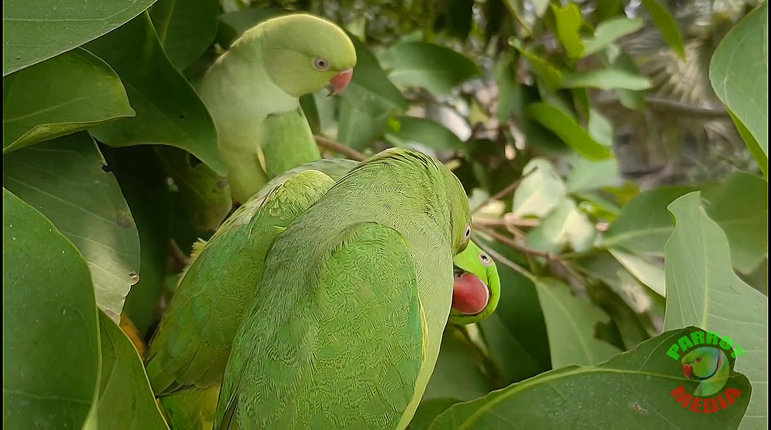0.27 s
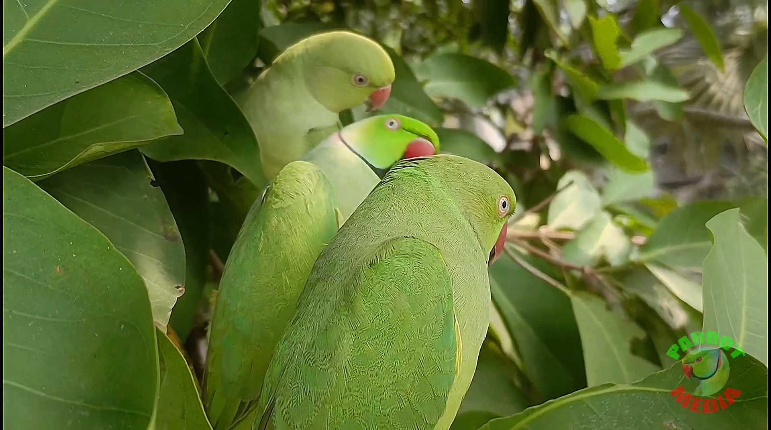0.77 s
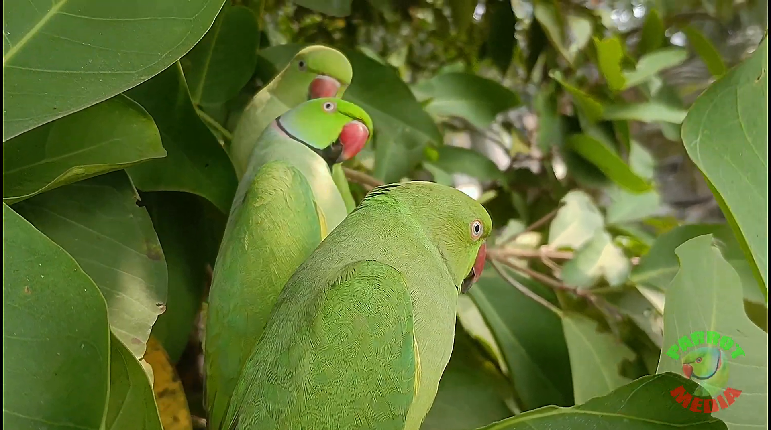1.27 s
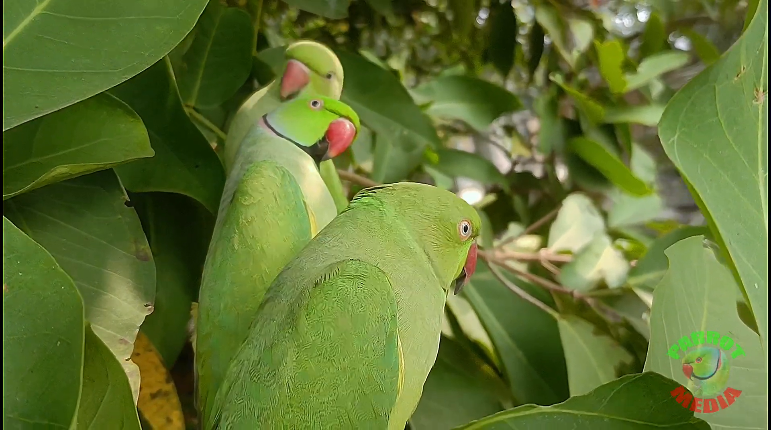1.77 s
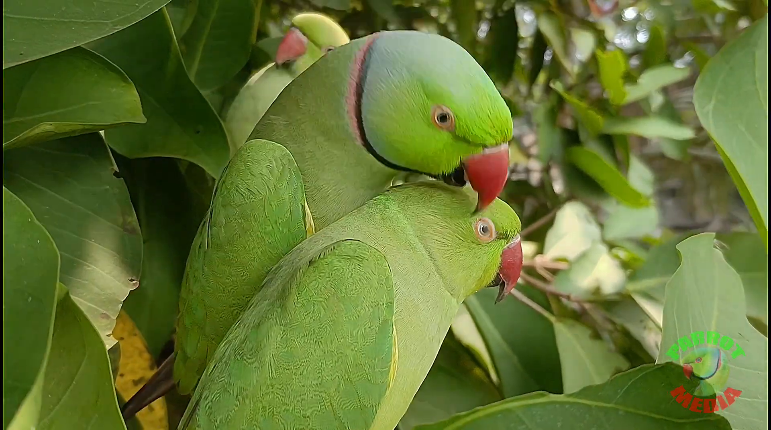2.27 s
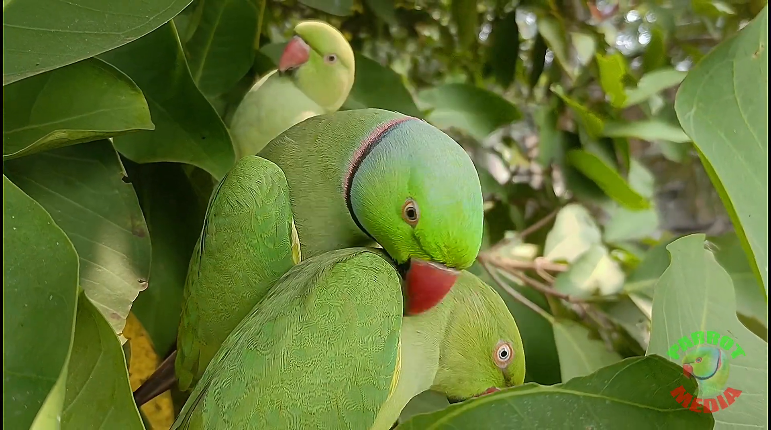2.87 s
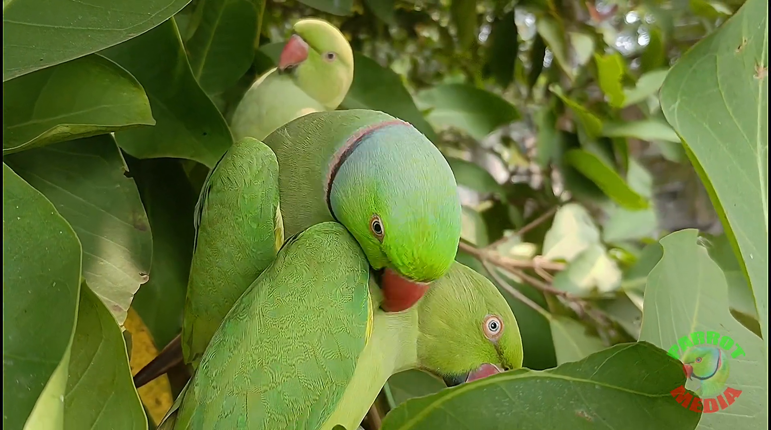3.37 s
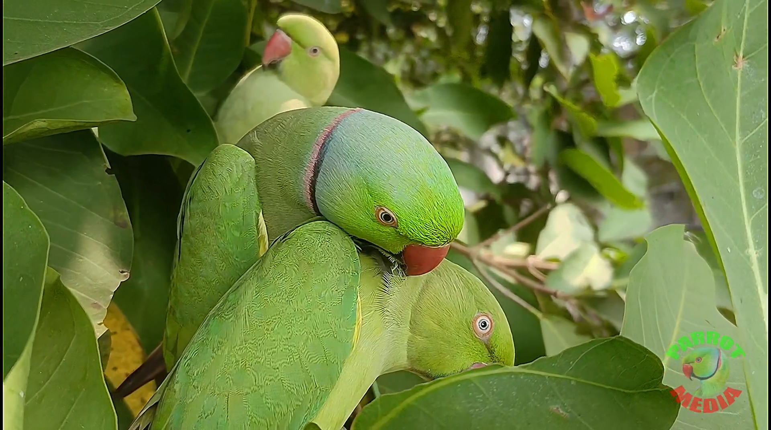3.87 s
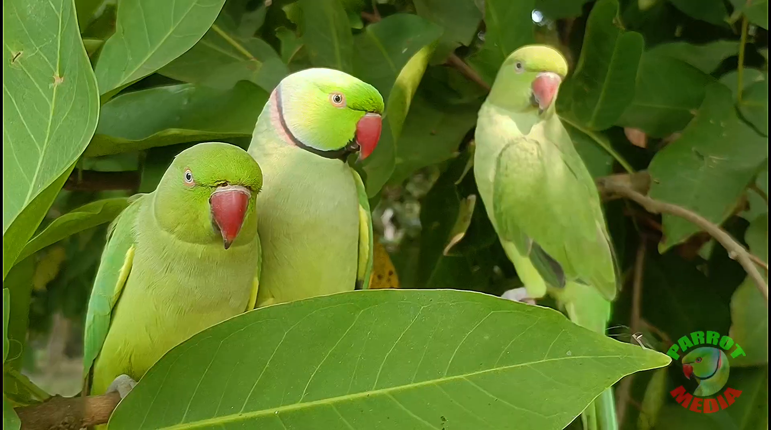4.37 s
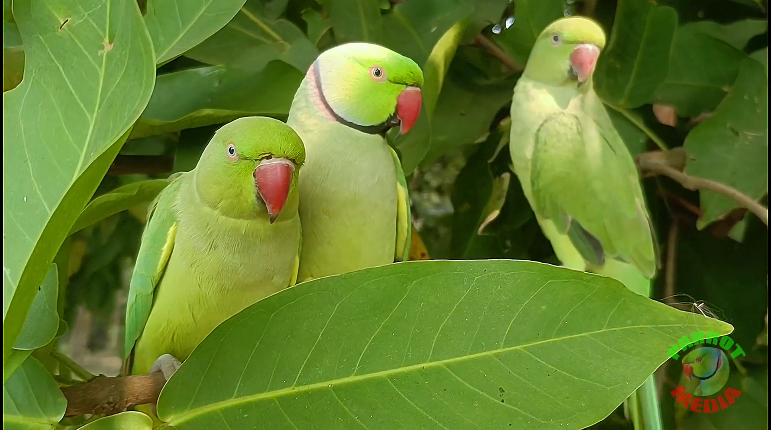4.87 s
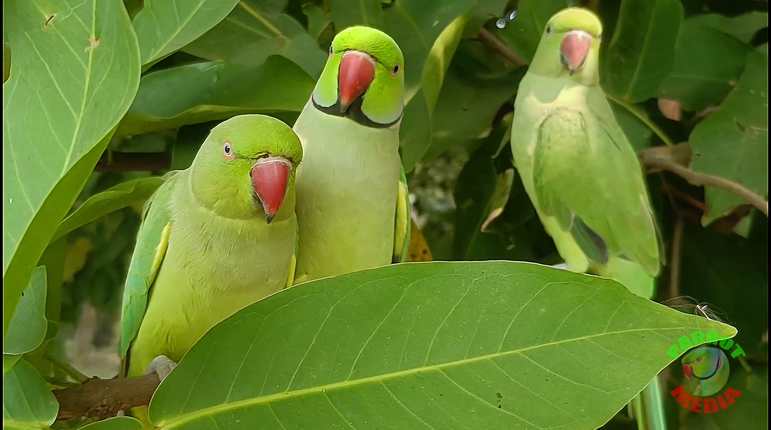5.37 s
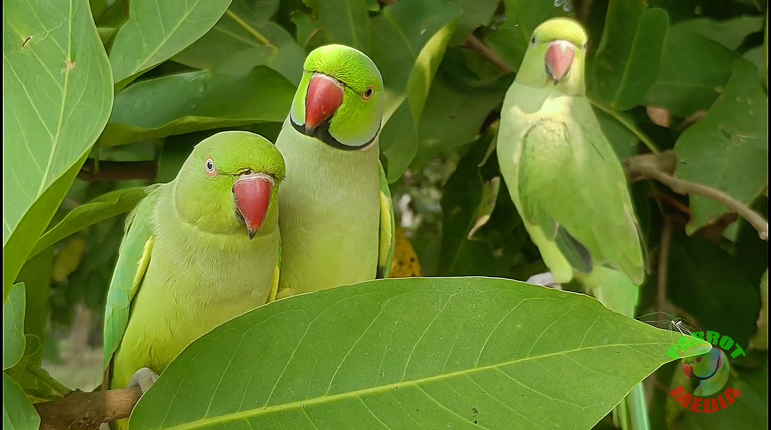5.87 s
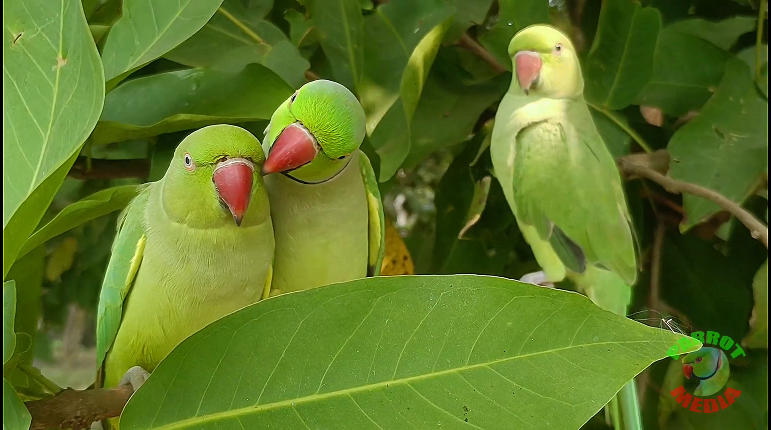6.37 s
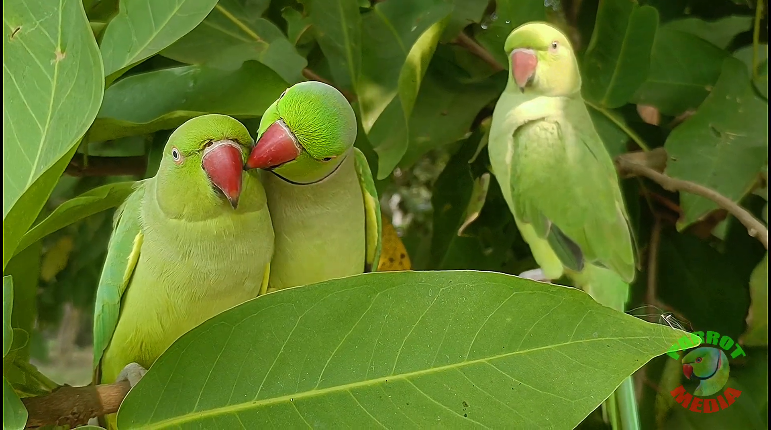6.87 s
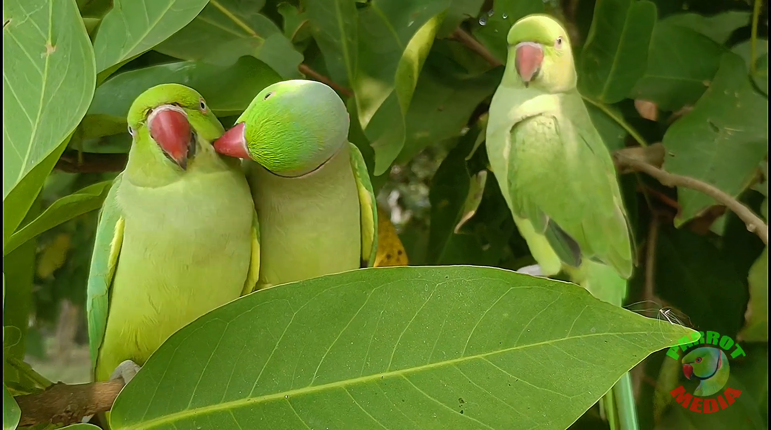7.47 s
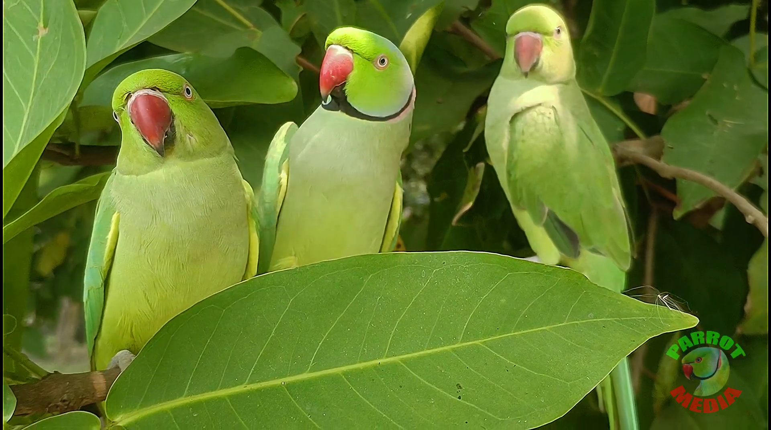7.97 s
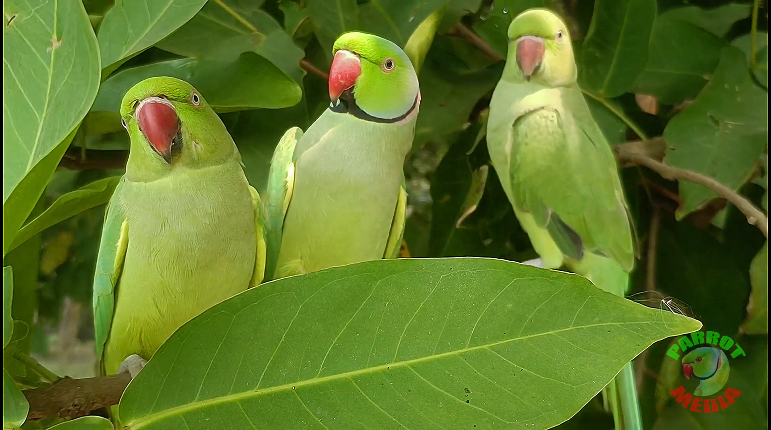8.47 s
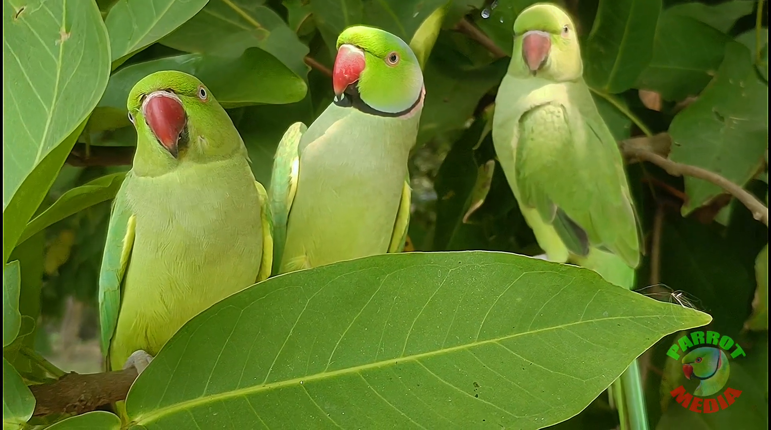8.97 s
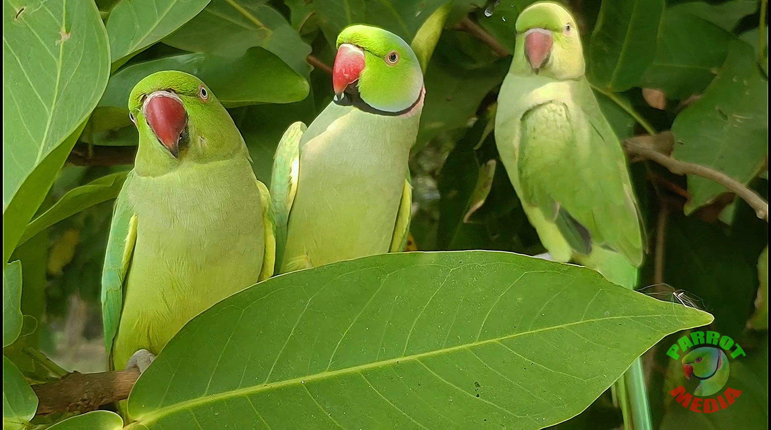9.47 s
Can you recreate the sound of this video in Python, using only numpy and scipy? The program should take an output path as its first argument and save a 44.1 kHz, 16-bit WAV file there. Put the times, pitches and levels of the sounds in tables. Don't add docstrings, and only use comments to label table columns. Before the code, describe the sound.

Close parakeets screech harshly, then squawk, trill and whistle in a leafy tree; small birds twitter far off before a second screeching burst.

```python
import sys
import numpy as np
from scipy import signal
from scipy.io import wavfile
from scipy.ndimage import uniform_filter1d

SR = 44100
rng = np.random.default_rng(int(sys.argv[2]) if len(sys.argv) > 2 else 0)


def linear_from_db(decibels):
    return 10 ** (np.asarray(decibels, float) / 20)


def transcribe(signal):
    frames = np.atleast_2d(signal).T
    limited = np.clip(frames, -1, 1)
    pcm = np.round(limited * 32767).astype(np.int16)
    wavfile.write(sys.argv[1], SR, pcm)


N = 429093


def evened(x):
    return x / np.sqrt(np.mean(abs(x) ** 2) + 1e-20)


def read(points, hz):
    f, value = np.transpose(points)
    return np.interp(np.log(hz + 1), np.log(f + 1), value)


def add(mix, s, sound):
    part = mix[:, round(s * SR):][:, :sound.shape[1]]
    part += sound[:, :part.shape[1]]


def backdrop(t):
    # start_s, end_s, first_lift_db, last_lift_db
    spells = [
        (0, 1.3, 6, 8),
        (2.0, 4.62, 10, 5),
        (6.08, 8.31, 7, 5.5),
    ]
    # centre_s, width_s, lift_db
    gusts = [
        (6.72, .16, 3.5),
        (7.8, .14, 5),
        (4.5, .06, 3.5),
    ]
    # time_s, level_db
    flock_near = [(0, -66), (1.5, -69.5), (2.1, -66), (4.3, -69), (4.5, -61), (4.7, -65), (5.9, -61),
                  (6.1, -63), (8.3, -66), (8.5, -63), (9.73, -73.5)]
    lift_db = 0
    for start_s, end_s, first_db, last_db in spells:
        inside = (t >= start_s) * (t < end_s)
        lift_db = lift_db + inside * np.interp(t, (start_s, end_s), (first_db, last_db))
    lift_db = uniform_filter1d(lift_db, size=5, mode="nearest")
    gust_db = sum(db * np.exp(-((t - s) / width_s) ** 2) for s, width_s, db in gusts)
    flock_db = np.interp(t, *np.transpose(flock_near)) + .6 * lift_db
    return -52 + gust_db, -67 + lift_db, flock_db, -69 + .5 * lift_db


def garden():
    # freq_hz, density_db
    rumble_bands = [(12, -44), (20, -21), (48, -0.5), (113, -1.5), (156, -4), (320, -23), (420, -51.5),
                    (700, -120)]
    hum_bands = [(150, -36.5), (250, -5.5), (570, -8.5), (824, -15), (897, -17.5), (2060, -16.5),
                 (2400, -13.5), (3120, -66), (5280, -120)]
    flock_bands = [(1060, -42.5), (1800, -14.5), (3120, -4), (4360, -6), (4670, -5.5), (5020, -17),
                   (5300, -18), (6890, -44), (11700, -120)]
    hiss_bands = [(2940, -41.5), (5000, 0), (6850, 1.5), (9380, -6.5), (14600, -1), (15700, -16),
                  (16500, -41)]
    # freq_hz, likeness_0_to_1
    likeness = [(30, .975), (300, .97), (1000, .8), (2500, .2), (8000, .05)]
    frames, hz = N // 256 + 5, np.fft.rfftfreq(1024, 1 / SR)
    a, b, c, d, patches = rng.standard_normal((frames, 513, 5)).T
    patches = evened(uniform_filter1d(uniform_filter1d(patches, 8, 0), 14, 1))
    shapes = (rumble_bands, hum_bands, flock_bands, hiss_bands)
    levels_db = backdrop(np.arange(frames) * 256 / SR)
    power = 0
    for shape, level_db, patchy_db in zip(shapes, levels_db, (.4, .5, 2.2, .8)):
        gain = linear_from_db(read(shape, hz)) * (hz >= shape[0][0]) * (hz <= shape[-1][0])
        level = linear_from_db(level_db + patchy_db * patches)
        power = power + (gain[:, None] / np.linalg.norm(gain) * level) ** 2
    same = np.clip(read(likeness, hz), -1, 1)[:, None]
    left = a + 1j * b
    right = same * left + np.sqrt(1 - same ** 2) * (c + 1j * d)
    z = np.array([left, right]) * np.sqrt(power)
    return linear_from_db(-3.0) * signal.istft(z, nperseg=1024, noverlap=768)[1][:, :N]


def foliage(x, t60_s, size):
    t = np.arange(size) / SR
    sign = rng.choice([-1., 1.], (2, size))
    taps = sign * (rng.random((2, size)) < .05) * linear_from_db(-60 * t / t60_s) * (t > .004)
    return signal.fftconvolve(x, taps / np.linalg.norm(taps[0]), axes=1)[:, :N]


def twitter():
    # start_s, length_s, level_db
    swoops = [(.009, .056, -61.5), (5.0, .085, -61), (5.2, .094, -60.5), (5.398, .08, -57.5),
              (5.59, .085, -58), (5.811, .084, -60), (6.237, .11, -59), (6.49, .075, -60),
              (8.15, .12, -60.5), (8.38, .082, -59), (8.596, .079, -58.5)]
    pips = [(.094, .063, -67), (1.177, .043, -65.5), (1.37, .028, -68.5), (1.545, .036, -68),
            (1.735, .035, -65.5), (3.3, .03, -64.5), (4.46, .074, -68), (5.739, .03, -55),
            (5.91, .011, -56), (6.418, .025, -59), (8.291, .08, -68), (8.876, .08, -75), (9.41, .06, -74),
            (9.572, .062, -71)]
    queries = [
        (7.734, .043, -63),
        (7.978, .029, -61.5),
        (8.33, .061, -69),
        (8.895, .03, -66.5),
        (9.169, .04, -69),
        (9.494, .04, -70),
    ]
    # start_s, length_s, start_hz, end_hz, level_db
    other_notes = [(1.656, .12, 3300, 3670, -69), (1.714, .08, 5130, 5400, -65.5),
                   (1.733, .097, 5900, 6170, -70.5), (4.415, .054, 4900, 4100, -62),
                   (4.773, .022, 3200, 2400, -58), (4.799, .15, 4980, 2420, -66.5),
                   (4.925, .039, 6800, 5950, -62.5), (5.68, .12, 3300, 3400, -66.5),
                   (5.833, .033, 2780, 2230, -62), (6.025, .06, 4720, 3770, -56),
                   (6.6, .07, 3700, 4700, -63), (4.93, .05, 2600, 2400, -64),
                   (6.198, .098, 2700, 2250, -68.5), (6.74, .09, 6500, 6000, -61.5),
                   (8.101, .12, 3250, 3050, -66.5), (8.091, .08, 3500, 3450, -67),
                   (9.502, .15, 3150, 3050, -76), (9.713, .025, 4950, 4480, -59),
                   (3.499, .39, 437, 444, -69.5), (4.042, .14, 725, 706, -71),
                   (4.797, .35, 729, 619, -77.5), (7.656, .72, 736, 663, -77.5)]
    phrases = [(swoops, 4720, 3180), (pips, 4470, 4530), (queries, 3530, 4070)]
    notes = []
    for rows, start_hz, end_hz in phrases:
        notes += [(s, length_s, start_hz, end_hz, db) for s, length_s, db in rows]
    return notes + other_notes


def songbirds():
    out = np.zeros((2, N))
    for s, length_s, start_hz, end_hz, db in twitter():
        u = np.arange(0, 1, 1 / SR / length_s)
        depth = .045 if start_hz > 6300 else .016
        wheeze = depth * evened(uniform_filter1d(rng.standard_normal(len(u)), 60))
        offset = rng.uniform(0, .3, (2, 1))
        hz = start_hz * (end_hz / start_hz) ** u * (1 + wheeze)
        tone = np.sin(2 * np.pi * (np.cumsum(hz) / SR + offset))
        swell = np.sin(np.pi * u ** 0.45) ** 0.7
        add(out, s, linear_from_db(db + 4.3) * linear_from_db([[.8], [-.8]]) * tone * swell)
    return out + linear_from_db(-.5) * foliage(out, t60_s=.4, size=22000)


def voice(pitch, rough, bright_db, beak, shade, edge_db, hollow_db):
    # freq_hz, gain_db
    throat_bands = [(400, 2.5), (1100, -9), (1600, 2.46), (1950, -1.5), (2450, -18.5), (3200, -6.5),
                    (4300, -0.74), (5200, -2), (6000, -13), (7800, -19.5), (9200, -41), (10800, -22.5),
                    (12800, -28), (15500, -34)]
    # freq_hz, phase_rad
    twist = [(2000, 0.015), (2900, 0.59), (3700, 1.3), (4900, -.8), (7000, 1.5)]
    # freq_hz, left_right_db
    ports = [(500, -1.5), (1500, -0.5), (2300, -16.5), (3100, -6.5), (4250, 11), (4800, 3.5), (5300, 0),
             (6800, -13), (8000, 4), (9800, 12.5), (13000, 3.5)]
    port_lag = 5.69
    order = np.arange(1, int(15800 / pitch.min()))[:, None]
    hz = order * pitch
    upper = 1 / (1 + (2500 / hz) ** 8)
    top = 1 / (1 + (5800 / hz) ** 8)

    edge_share = np.where((hz < 9000) | (pitch > 950), 1, .25)
    throat_db = read(throat_bands, hz / beak ** (1 - upper))
    throat_db += upper * (bright_db + 2.5) + top * edge_db * edge_share
    throat_db += hollow_db * np.exp(-((hz - 3100) / 600) ** 2)
    throat = linear_from_db(throat_db) * (hz < 15500)
    throat /= np.sqrt(.5 * (throat ** 2).sum(0))

    noise = rng.standard_normal((2,) + hz.shape)
    breath = evened(uniform_filter1d(uniform_filter1d(noise[0] + 1j * noise[1], 30), 30))
    blur = np.clip(rough * (.6 + 2.2 * upper + 3 * top) + .22 * top, 0, 1)
    throat *= linear_from_db(3.5 * upper * evened(uniform_filter1d(noise[0], 900)))
    spread = rng.uniform(-1.6, 1.6, order.shape)
    partials = np.exp(2j * np.pi * order * np.cumsum(pitch) / SR + 1j * spread)
    wave = throat * partials * (np.sqrt(1 - blur ** 2) + blur * breath)

    lead = read(twist, hz) - 2 * np.pi * hz * port_lag / SR
    pan = linear_from_db(.5 * shade * read(ports, hz))
    return np.array([(wave * pan * np.exp(1j * lead)).real.sum(0), (wave / pan).real.sum(0)])


def beat(peak_db, hz, bright_db, ms, edge_db=4.0):
    u = np.arange(0, 1.2, 1000 / ms / SR)
    swell = (u / .36 * np.exp(1 - u / .36)) ** 2.6
    tone = voice(hz * (1.05 - .1 * u), rough=.25, bright_db=bright_db - 5 * u, beak=.72, shade=1.0,
                 edge_db=edge_db, hollow_db=5.0)
    return linear_from_db(peak_db - 9) * swell * tone


def murmurs():
    # start_s, beats, gap_s, peak_db, pitch_hz, first_bright_db, last_bright_db
    trills = [
        (.095, 9.7, 0.018, -46, 1110, -3.5, 4.1),
        (6.73, 11, .0195, -41, 1150, -2.5, 17),
    ]
    out = np.zeros((2, N))
    for s, count, gap_s, peak_db, hz, first_db, last_db in trills:
        for k in range(round(count)):
            bright_db = first_db + (last_db - first_db) * k / count
            add(out, s + k * gap_s, beat(peak_db + rng.normal(0, 1.4), hz, bright_db, 6.0))
    return out


def effort(t, db, soft_db, rise_s, fade_db_per_s, close_db, close_s):
    onset_db = soft_db * np.exp(-t / rise_s)
    closing_db = close_db * np.exp((t - t[-1]) / close_s)
    return db + onset_db - fade_db_per_s * t - closing_db


def bowl(length_s, db, turn_hz, turn_s, bend_hz_per_s2, manner):
    t = np.arange(0, length_s, 1 / SR)
    return effort(t, db, **manner), turn_hz + bend_hz_per_s2 * (t - turn_s) ** 2


def glide(length_s, db, start_hz, end_hz):
    t = np.arange(0, length_s, 1 / SR)
    way = t / length_s + .04 * np.sin(2 * np.pi * t / length_s) * (end_hz < start_hz)
    effort_db = effort(t, db, soft_db=-2.5, rise_s=.006, fade_db_per_s=80, close_db=28, close_s=.012)
    return effort_db, start_hz + (end_hz - start_hz) * way


def traced(rows):
    s, db, hz = np.transpose(rows)
    t = np.arange(s[0], s[-1], 1 / SR)
    effort_db = uniform_filter1d(np.interp(t, s, db), 300, mode="nearest")
    return effort_db, uniform_filter1d(np.interp(t, s, hz), 600, mode="nearest")


def call(effort_db, pitch, hoarse, pose):
    bright_db, shade, edge_db, beak, hollow_db = pose
    t = np.arange(len(pitch)) / SR
    if pitch.min() > 1200:
        tilt_db = .02 * (pitch - 1800)
        bright_db = bright_db + tilt_db
        edge_db = edge_db - tilt_db
    else:
        dull_at_s = .033
        bright_db = bright_db - 4 * np.exp(-((t - dull_at_s) / .014) ** 2)
        shrill = np.clip(1 + (pitch - 1250) / 300, 0, 1) * (t > dull_at_s)
        hollow_db = hollow_db * (1 - 1.1 * shrill)
        edge_db = edge_db - 9 * shrill
    pitch = pitch * (1 + .003 * evened(uniform_filter1d(rng.standard_normal(len(t)), 120)))
    rough = hoarse + 0.005 * (effort_db.max() - effort_db) + .25 * np.exp(-t / 0.013)
    edges = np.minimum(np.minimum(t, t[-1] - t) / 0.0038, 1)
    edge_db = edge_db - 40 * t
    return linear_from_db(effort_db) * edges * voice(pitch, rough, bright_db, beak, shade, edge_db, hollow_db)


def held_calls():
    # start_s, length_s, effort_db, turn_hz, turn_after_s
    openers = [
        (.311, .097, -31, 618, .043),
        (6.962, .098, -28.5, 585, .036),
    ]
    screeches = [
        (.45, .128, -17, 725, .075),
        (.614, .123, -15.5, 750, .078),
        (7.101, .121, -19, 675, .073),
        (7.263, .122, -16, 700, .073),
    ]
    arches = [
        (2.0, .087, -28.5, 572, .036),
        (6.487, .09, -37, 512, .044),
    ]
    # start_s, length_s, effort_db, start_hz, end_hz
    glides = [
        (2.752, .116, -22, 420, 955),
        (3.388, .114, -24, 425, 945),
        (3.871, .129, -22.5, 725, 320),
        (7.427, .115, -16.5, 1030, 430),
    ]
    # time_s, effort_db, pitch_hz
    upswing = [
        (.776, -12, 1098),
        (.808, -18.5, 924),
        (.84, -20, 770),
        (.88, -25.5, 707),
        (.906, -28.5, 731),
        (.935, -23, 1100),
        (.975, -16, 1360),
        (1.004, -21, 1492),
        (1.012, -45, 1517),
    ]
    # time_s, effort_db, pitch_hz
    whistles = [
        [(2.434, -25.5, 1850), (2.47, -23, 1870), (2.508, -22.5, 1696), (2.53, -23, 1499), (2.552, -35.5, 1818),
         (2.56, -50.5, 2060)],
        [(3.091, -23, 1831), (3.121, -23.5, 1809), (3.143, -23.5, 1696), (3.163, -23.5, 1760),
         (3.185, -25, 2700), (3.195, -44.5, 2627)],
        [(3.701, -23.5, 1813), (3.732, -21, 1904), (3.778, -21.5, 1739), (3.801, -21.5, 2341),
         (3.824, -27.5, 2368), (3.855, -28.5, 1724)],
    ]
    loud = dict(soft_db=-4.5, rise_s=.012, fade_db_per_s=95, close_db=30, close_s=.01)
    soft = dict(soft_db=-7, rise_s=.02, fade_db_per_s=5, close_db=26, close_s=.011)
    clear, husky, pure = .065, .11, .03
    calls = [(s, *bowl(*row, 52000, loud), clear) for s, *row in screeches]
    calls += [(s, *bowl(*row, 58000, soft), husky) for s, *row in openers]
    calls += [(s, *bowl(*row, -88000, soft), husky) for s, *row in arches]
    calls += [(s, *glide(*row), husky) for s, *row in glides]
    calls += [(rows[0][0], *traced(rows), pure) for rows in [upswing] + whistles]
    return calls


def throat_trills():
    # time_s, peak_db
    trills = [
        [(2.222, -40), (2.24, -32.5), (2.261, -32), (2.281, -23), (2.3, -20), (2.321, -18), (2.342, -20.5),
         (2.361, -23.5), (2.381, -27), (2.4, -29), (2.416, -32.5)],
        [(2.914, -29.5), (2.934, -21.5), (2.954, -18), (2.976, -8), (2.997, -1.5), (3.018, -16), (3.037, -15),
         (3.055, -24.5), (3.072, -29.5)],
        [(3.535, -40), (3.555, -32), (3.575, -18.5), (3.596, -11.5), (3.618, -13), (3.639, -19), (3.66, -31.5),
         (3.678, -38)],
    ]
    # bright_db, edge_db, halfway_share (pitch sunk halfway)
    tones = [(-15, 1.5, .55), (-1.5, -2.5, .3), (-6, 7, .25)]
    high_hz, low_hz = 1380, 1030
    beats = []
    for rows, (bright_db, edge_db, halfway) in zip(trills, tones):
        loudest_db = max(db for _, db in rows)
        for k, (s, peak_db) in enumerate(rows):
            high = 1 / (1 + np.exp((k / len(rows) - halfway) / .1))
            hz = low_hz + (high_hz - low_hz) * high
            beat_bright_db = bright_db + .35 * (loudest_db - peak_db)
            beats.append((s, peak_db, hz, beat_bright_db, 11 - 4.5 * high, edge_db))
    return beats


def parakeets():
    # bright_db, port_shading_factor, edge_db (above 6 kHz), beak_opening_factor, hollow_db
    poses = [(-1.5, .6, 5, .97, -6), (-.5, 1.2, 5, .95, -9), (-4.5, 1.3, -3.5, .9, 3),
             (-5, 1.5, -5, .92, 5.5), (-8, 1.2, -6.5, .8, 1.5), (-11, 1.4, -8.5, .75, 2.5),
             (-12, 1.2, -14.5, .85, 1.5), (-26, .8, -16, .85, 3), (-11, .78, 12, .95, 5.5),
             (-9.5, 1.1, 11, .9, -3), (-10, .83, 14.5, .9, -6), (-5, 1.1, 2.5, .92, 1.5),
             (.4, .84, 1.5, .9, -8), (-12, .88, 10, .99, -2.5), (-17, 1.6, 14, 1.2, -3),
             (-13, .7, 10, 1.01, -12)]
    # time_s, peak_db, pitch_hz, bright_db, length_ms
    clucks = [
        (2.62, -40, 1200, -6, 12),
        (2.2, -41, 1400, 8, 7),
        (.587, -31, 1050, -11, 5.9),
        (.747, -22.5, 1070, .4, 8.3),
        (1.174, -46, 1442, -9.5, 24),
        (1.219, -46.5, 1310, -7, 13),
        (2.177, -26, 1410, -16.5, 14),
        (2.927, -12.5, 1526, -3.5, 11),
    ]
    out = murmurs()
    beats = clucks + throat_trills()
    for (s, effort_db, pitch, hoarse), pose in zip(held_calls(), poses):
        add(out, s, call(effort_db, pitch, hoarse, pose))
        if 900 < pitch[0] < 1200:
            beats.append((s - .014, effort_db.max() + 3.5, pitch[0], -4.5, 14))
    for s, *control in beats:
        add(out, s - .002, beat(*control))
    return out + linear_from_db(-36) * foliage(out, t60_s=.22, size=12000)


def scene():
    return garden() + songbirds() + parakeets()


def low_pass(x):
    return signal.sosfilt(signal.butter(12, 16650, fs=SR, output="sos"), x)


def record(dry):
    return low_pass(dry)


dry = scene()
out = record(dry)
transcribe(out)
```